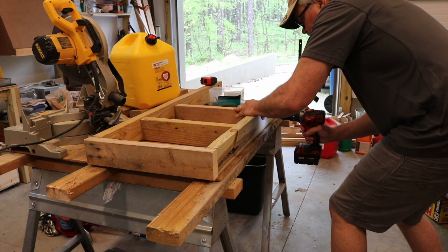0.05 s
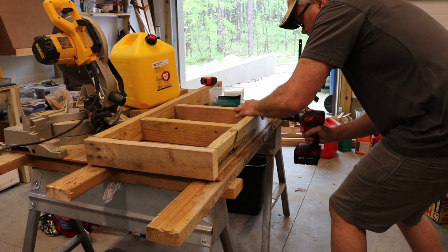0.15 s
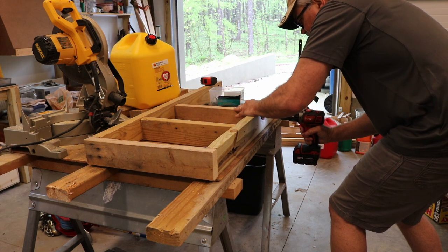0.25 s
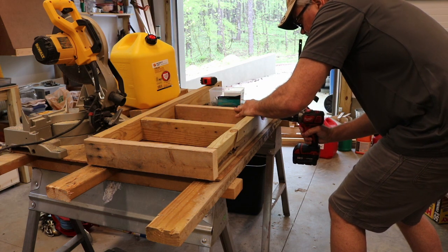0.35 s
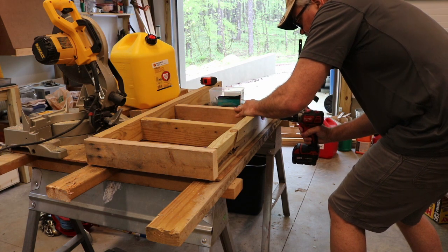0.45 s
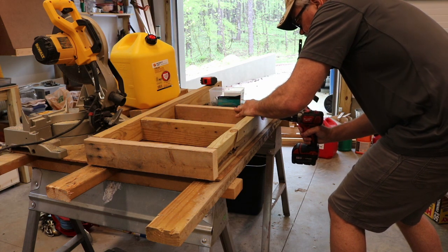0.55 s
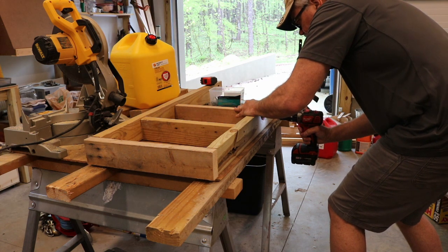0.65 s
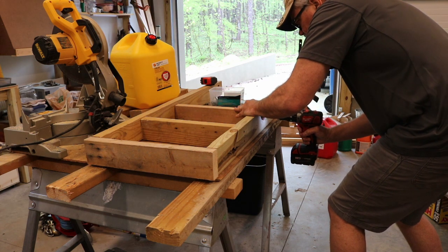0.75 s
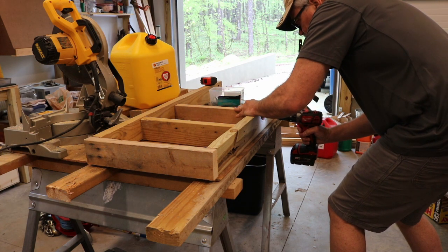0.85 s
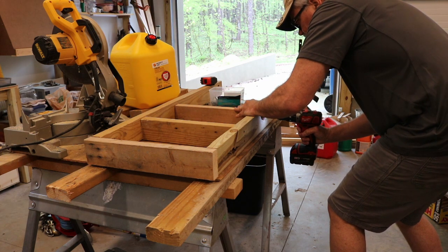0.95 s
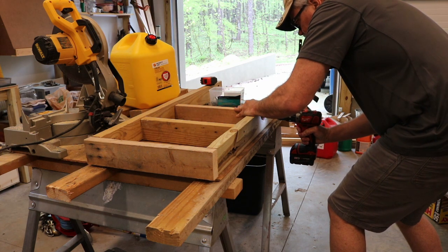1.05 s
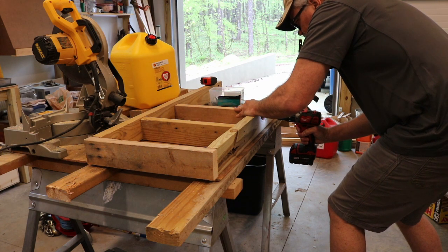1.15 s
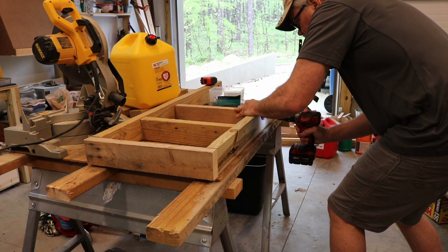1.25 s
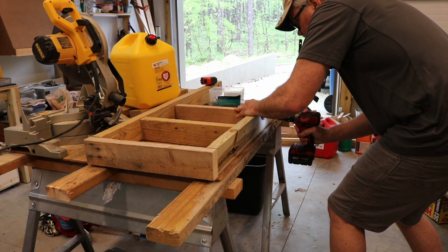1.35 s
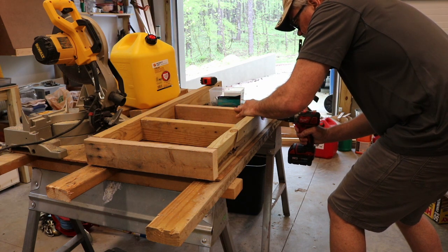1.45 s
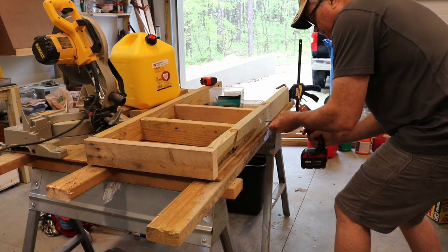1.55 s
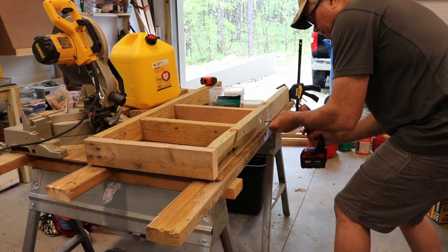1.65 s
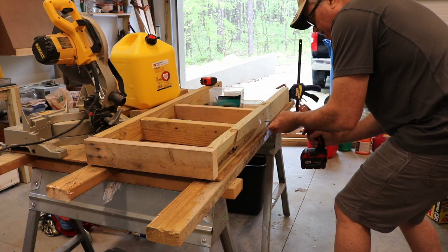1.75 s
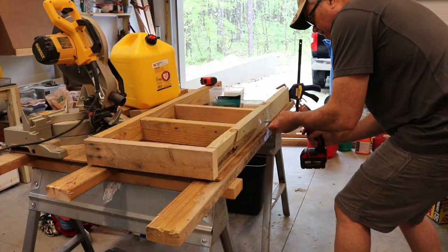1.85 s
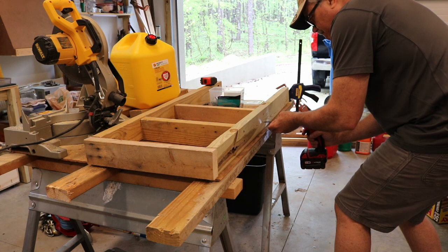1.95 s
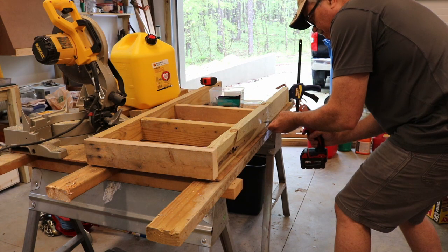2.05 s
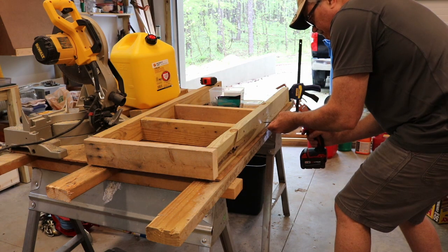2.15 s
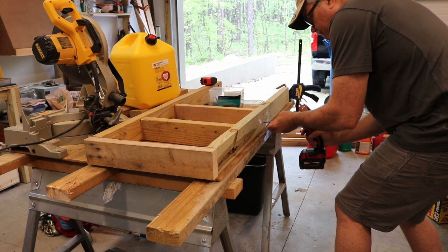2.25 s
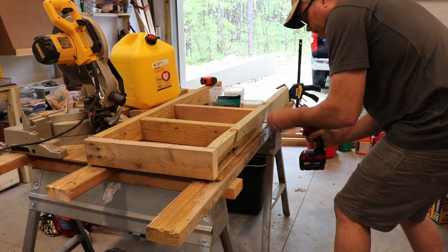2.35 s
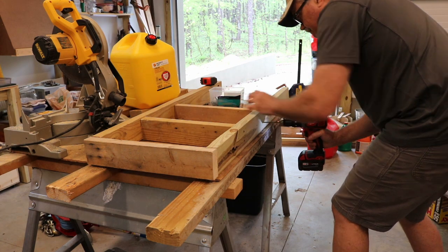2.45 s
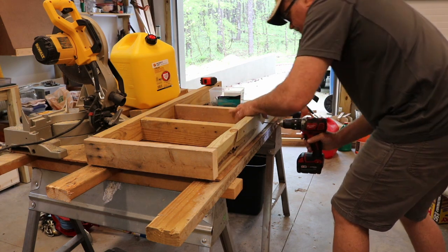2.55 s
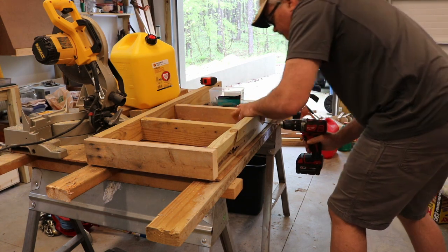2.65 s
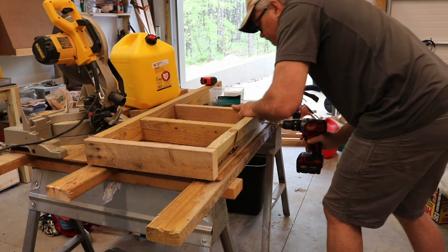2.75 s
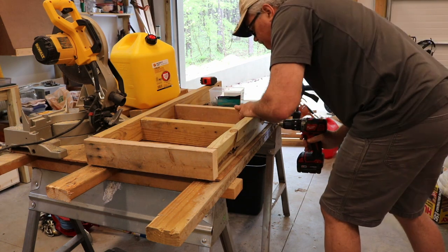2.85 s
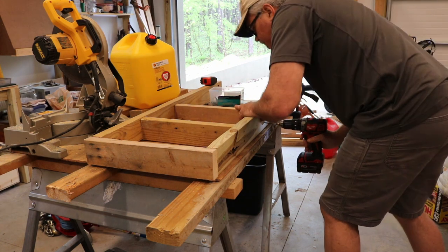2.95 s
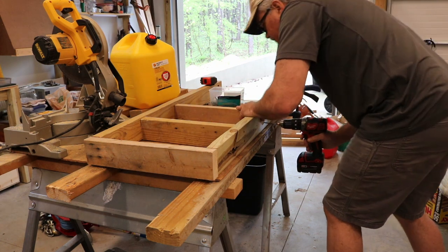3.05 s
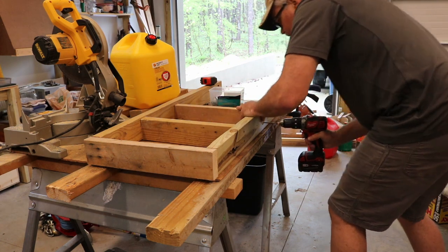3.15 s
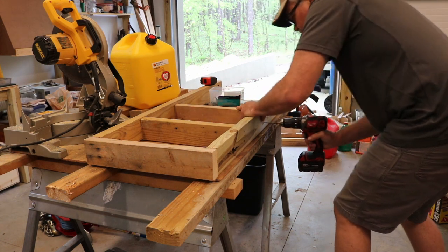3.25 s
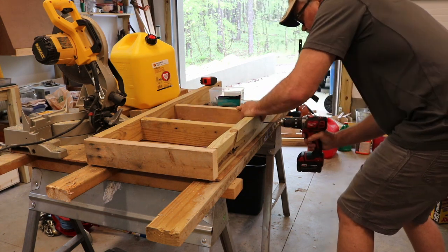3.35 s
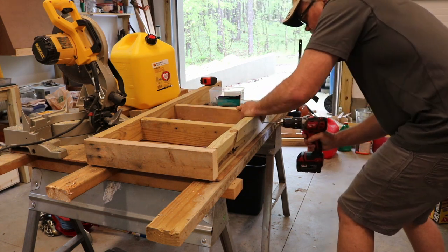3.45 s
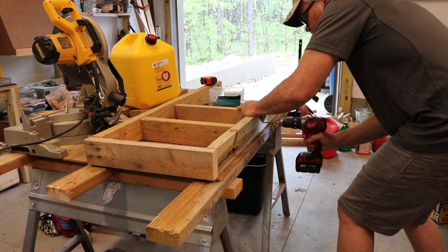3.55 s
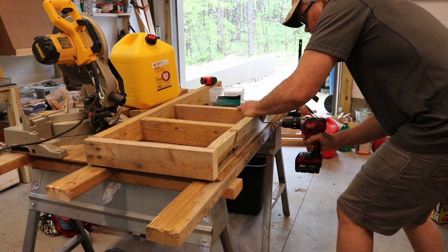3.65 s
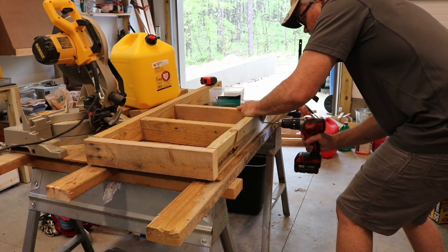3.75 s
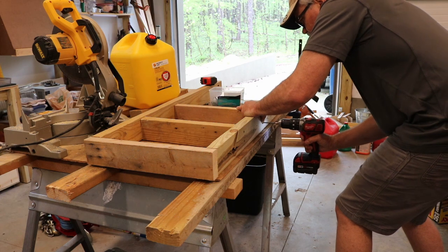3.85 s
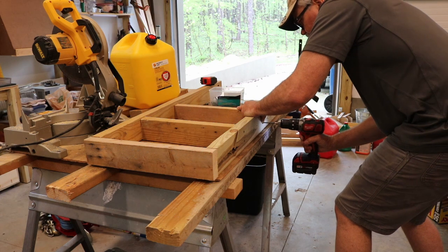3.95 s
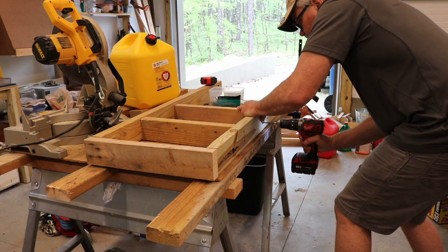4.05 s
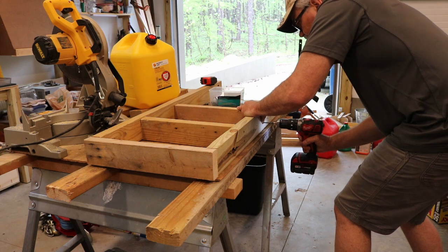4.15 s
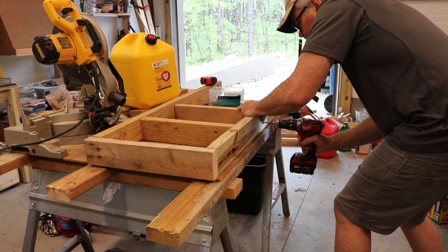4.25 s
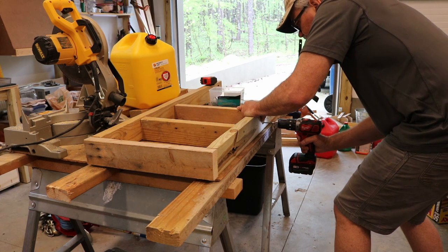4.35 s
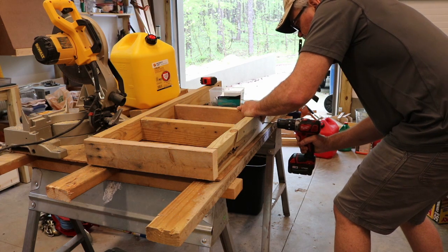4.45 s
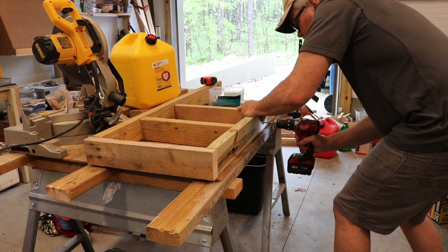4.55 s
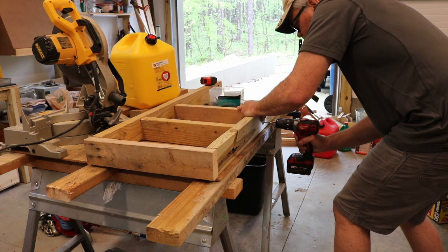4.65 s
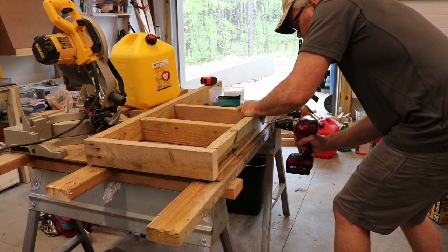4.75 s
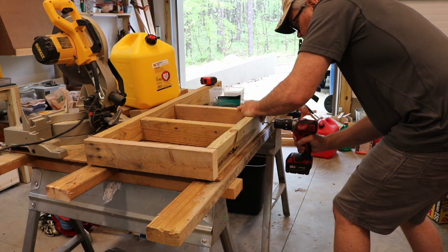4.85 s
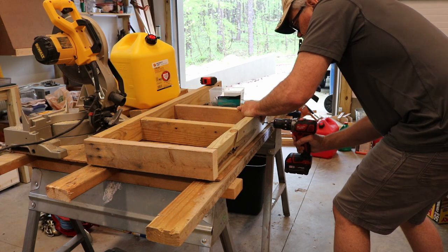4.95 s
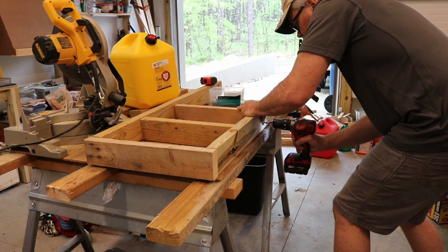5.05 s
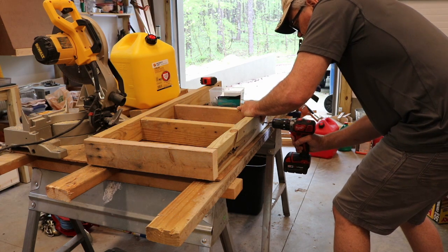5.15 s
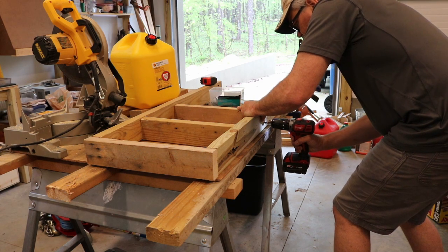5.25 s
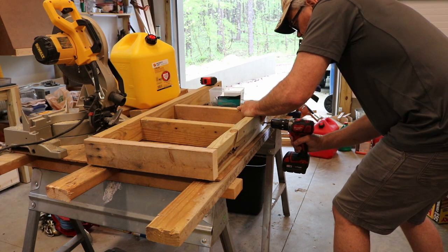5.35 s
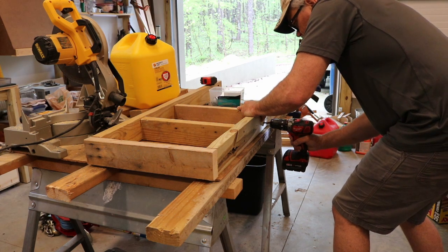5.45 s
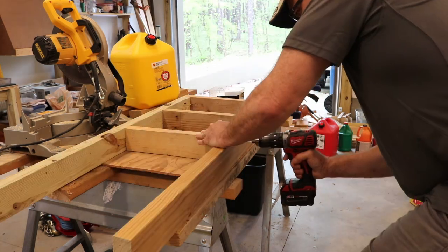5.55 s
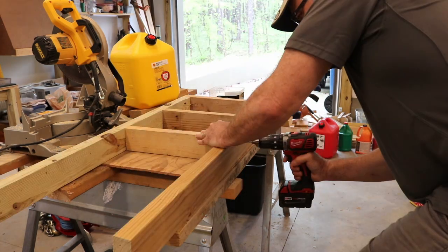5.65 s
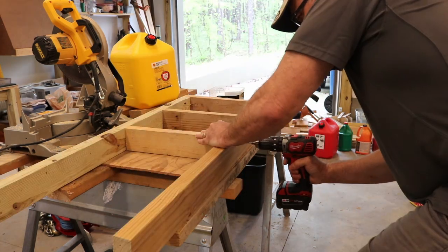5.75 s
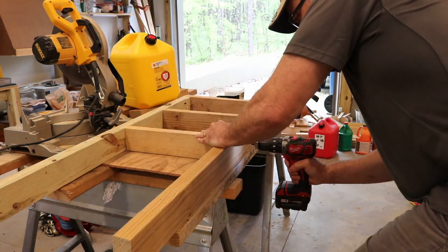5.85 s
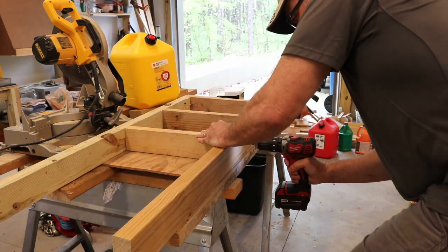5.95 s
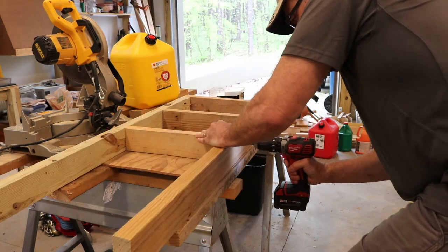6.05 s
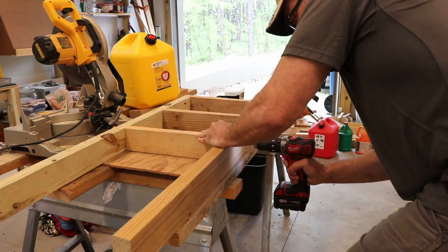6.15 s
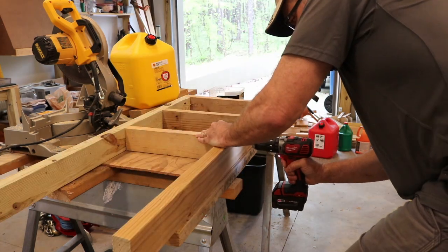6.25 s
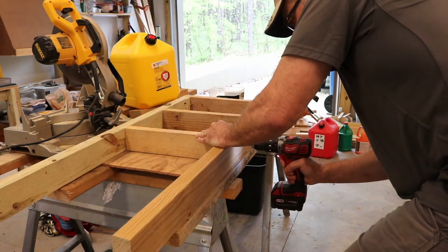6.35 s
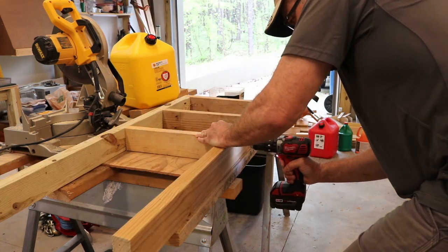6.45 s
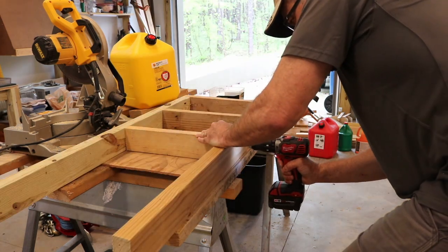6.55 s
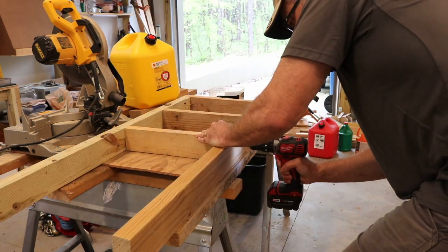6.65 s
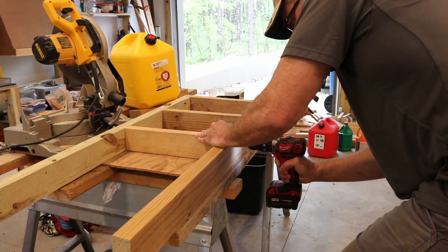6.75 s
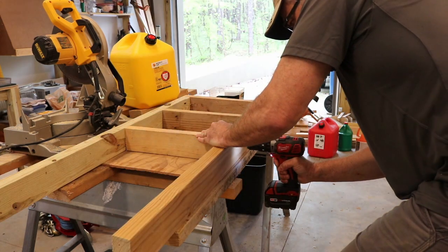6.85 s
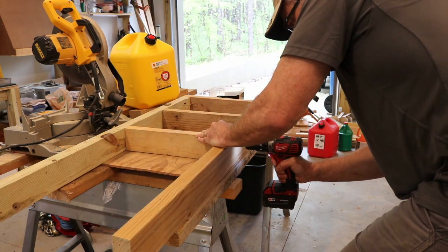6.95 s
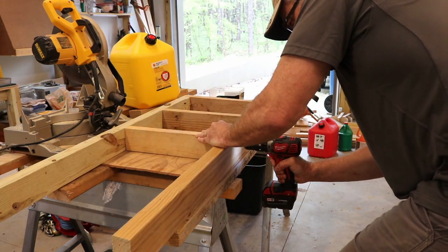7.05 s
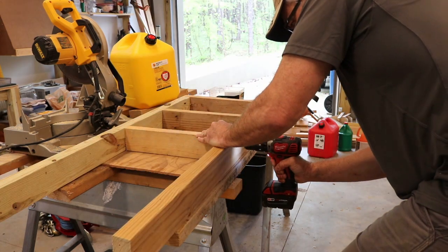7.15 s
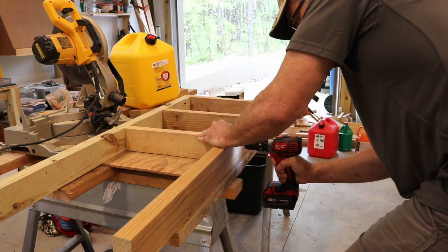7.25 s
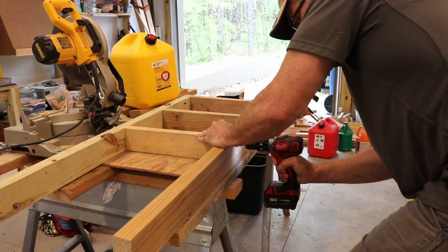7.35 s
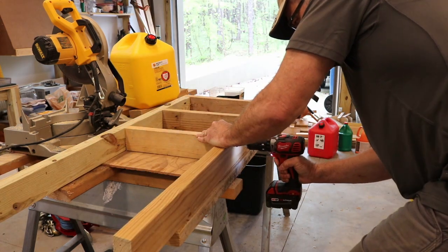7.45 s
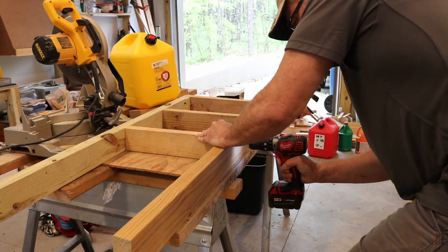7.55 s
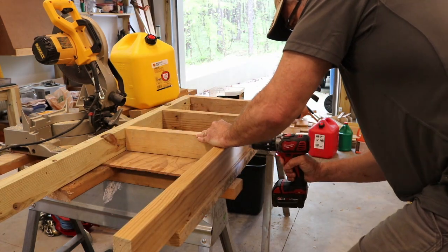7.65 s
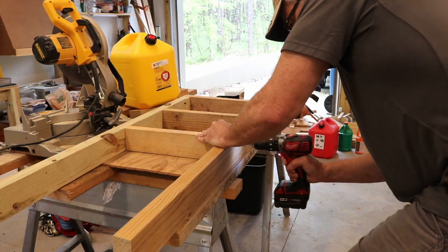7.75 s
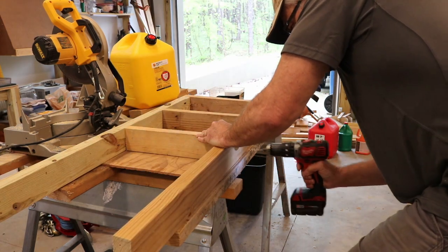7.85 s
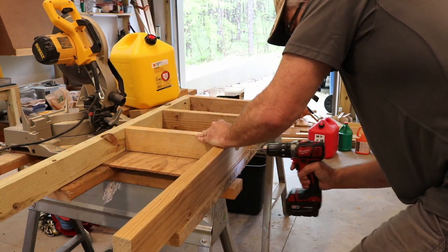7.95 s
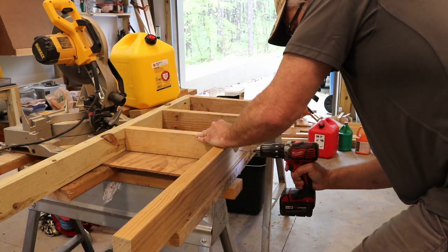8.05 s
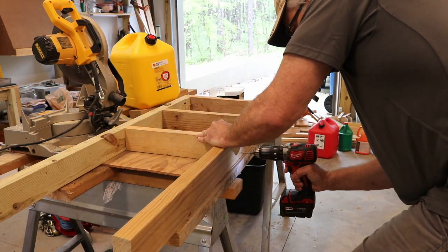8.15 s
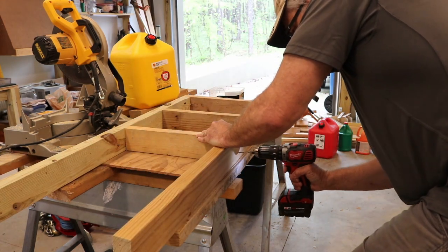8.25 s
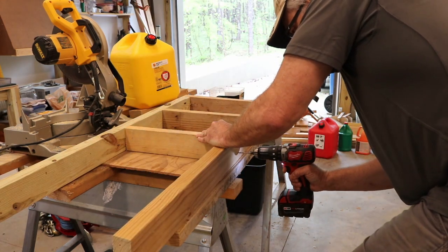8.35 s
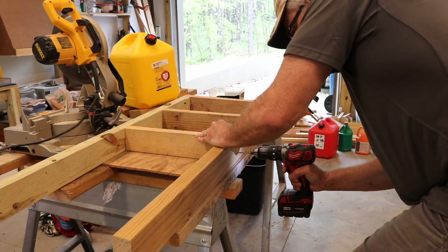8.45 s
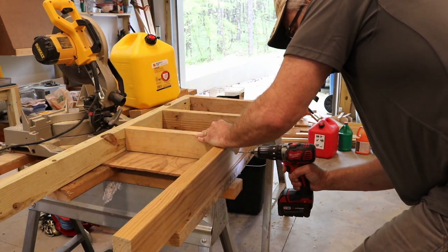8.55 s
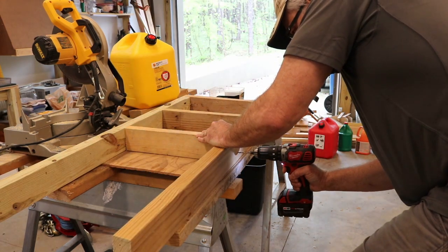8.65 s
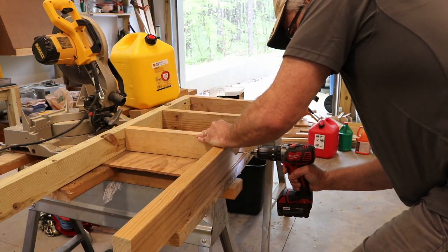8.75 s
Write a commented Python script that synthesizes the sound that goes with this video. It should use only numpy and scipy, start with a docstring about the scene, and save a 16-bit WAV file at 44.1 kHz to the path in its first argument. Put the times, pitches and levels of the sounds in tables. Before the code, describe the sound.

In a garage workshop, a cordless drill close by, slightly right, is already whining at full speed into a wooden frame. It cuts off abruptly; light knocks follow in the quiet. A second run clicks in, creeps, spins up in two steps and cuts off dead. After a clack, a third run leaps to full speed, the wood droning, then stops with a sharp clack and short echo. Soft room noise and fuzzy hum lie beneath.

```python
"""Cordless drill in a garage

A cordless drill bores into a wooden frame three times, over soft room noise and a faint, fuzzy hum.
Motor and gears whine on multiples of the shaft speed, over a rasp of noise that pulses with the turning;
the bit sets the wood droning and shuddering, and short clacks come from trigger, gears and knocks on the frame.
The first two runs break off abruptly, echo and all; the third stops short and rings away in the room."""
import sys
import numpy as np
from scipy import signal
from scipy.fft import rfft, irfft, next_fast_len
from scipy.io import wavfile
from scipy.ndimage import map_coordinates

SR = 44100
rng = np.random.default_rng(int(sys.argv[2]) if len(sys.argv) > 2 else 0)


def bounce(signal):
    """Save signal as a 16-bit WAV file at the path given by the first command-line argument."""
    frames = np.transpose(np.atleast_2d(signal))
    limited = np.clip(frames, -1, 1)
    pcm = np.round(limited * 32767).astype(np.int16)
    wavfile.write(sys.argv[1], SR, pcm)


N = 387638  # length in samples

# The three runs, base levels before push, trigger and trims: start_s, stop_s, swells_per_turn, cutting_db,
# rasp_db, hiss_db, gear_whine_db, motor_whistle_db, weaker_lines_db
RUNS = [(0, 1.546, 0.94, -40.5, -21, -23, -23, -30, 3),
        (3.495, 5.545, 1.8, -40.5, -26, -19.5, -21.5, -29, 3.5),
        (5.865, 7.948, 2, -42.5, -27, -20, -23.5, -32, 3)]
# Squeezes of the trigger: start_s, share_of_full_speed (0-1), spin_up_s (time constant)
SQUEEZES = [(3.541, .83, .043), (4.097, 1, .032), (5.887, 1, .026)]
# Speed with the trigger fully in, as the wood lets the motor run: time_s, speed_turns_per_s
FULL_SPEED = [(.1, 341), (.65, 335.1), (1.54, 331), (3.8, 328.7), (4.2, 328), (4.72, 340.6), (5.04, 338.4),
              (5.22, 330.2), (5.45, 327.7), (5.54, 322), (5.95, 343), (6.12, 346.3), (6.53, 346.7),
              (6.93, 343.3), (7.35, 343.9), (7.9, 345.8)]
# How hard the bit is pushed into the wood: time_s, push (0-1)
PUSH = [(.4, 0.8), (.7, 0.6), (1.3, .85), (1.54, .65), (3.6, 0.15), (4.08, .3), (4.2, 0.7), (4.7, 0.23),
        (5.5, 0.94), (5.95, 0.19), (6.7, 0.62), (7.25, 1), (7.55, 0.35), (7.92, 0)]
# Colour of the noise of bit and gears, relative: pitch_hz, run_1_db, run_2_db, run_3_db
RASP_COLOUR = [(100, -22.5, -47, -54), (184, -15.5, -23.5, -59), (256, -9, -23, -37),
               (466, -7, -8.5, -11.5), (800, -5, -7, -8), (1240, -1.5, -5, -1), (1584, -3.5, -5, -4.5),
               (2850, -2.5, -0.5, 0.5), (3840, 0, 0.4, -1), (5500, 0, 1.5, 2), (6700, 1, 1, 0),
               (9100, 0, 3.5, 4), (12100, -4, 2, 3), (15500, -12.5, 1.5, -0.5)]
# Weaker gear and motor lines, before each run's line level:
# multiple_of_speed, run_1_db, run_2_db, run_3_db
WEAK_LINES = [(4, -45, -41, -42.5), (6, -46, -48, -47.5), (8, -54, -46, -38.5), (10, -37.5, -48, -47),
              (11, -44.5, -60, -66), (12, -66, -46.5, -45.5), (14, -43, -54, -56), (15, -34.5, -55, -59),
              (16, -56, -51, -55), (18, -45, -37, -46), (19, -34, -57, -56), (21, -40, -60, -57),
              (22, -49, -31.5, -38.5), (24, -56, -67, -42), (26, -54, -54, -52), (31, -31, -58, -57),
              (34, -61, -48, -53), (36, -62, -38, -41), (38, -50, -32, -31.5), (40, -48, -36, -34),
              (41, -38, -60, -60), (42, -60, -34, -35), (44, -62, -39, -40.5), (45, -59, -42, -49)]
# The frame's drone in each run, before DRONE_GAIN_DB: time_s, level_db
DRONE_RUN_1 = [(0, -39), (1.54, -41.5)]
DRONE_RUN_2 = [(3.54, -52), (3.65, -41.5), (3.88, -36), (4.3, -42.5), (4.72, -34), (5.4, -38), (5.52, -34)]
DRONE_RUN_3 = [(5.95, -43.5), (6.038, -42), (6.188, -39), (6.702, -44), (7.074, -23.5), (7.258, -28),
               (7.374, -21.5), (7.65, -44), (7.94, -43.5)]
# Frame and gears shudder and sing under load, nominal times before the fades (an end well ahead of its
# start is silent): start_s, stop_s, multiple_of_speed, level_db, roughness (0-1, clipped above)
SHUDDERS = [(0, 1.7, 1, -37.5, 0.26), (0, 1.54, .745, -46.5, .45), (0, 1.54, 1.41, -45, 1.03),
            (0, 1.54, 1.76, -41.5, 0.6), (0, 1.54, .58, -57, 1), (.8, 1.6, 10, -38.5, 0.3),
            (0.599, 1.6, 11, -35.5, 0.4), (.9, 1.7, 15, -36, 0.2), (3.65, 4.05, 2.1, -40, .6),
            (3.65, 4.2, 3.5, -44, 1), (3.65, 4.05, 5.65, -43, .6), (3.68, 4.05, 12, -42, 0.5),
            (3.68, 4.08, 40, -34, .3), (3.75, 3.95, 42, -30, .3), (5.05, 5.5, 1.33, -40.5, 0.5),
            (5.05, 5.7, 3, -39, .5), (5, 5.3, 20, -33, 0.2), (5.2, 4.7, 42, -23, .4),
            (6.75, 7.1, 1.35, -47.5, 0.96)]
# Trigger, brake and small knocks of the tool on the frame, before the mix of ring and crack:
# start_s, level_db, ring_hz, brightness_db
CLACKS = [(1.735, -38, 1050, -18), (2.089, -29, 1117, -27), (2.097, -32, 2700, -22),
          (2.112, -38, 2540, -22), (2.247, -42, 1300, -14), (3.49, -22, 1004, 0), (5.11, -27, 180.4, -20),
          (5.778, -39, 1034, -20), (5.860, -18, 1107, 5.5), (7.932, -14, 1950, -7)]
# Ring modes of the casing: multiple_of_ring, level_db, t60_s
CASING = [(1, 3.5, 0.072), (1.4, 1, 0.034), (2.4, 2, 0.041), (4.3, -4, .03), (6, -1, 0.025)]
# Decay of the garage: pitch_hz, t60_s
GARAGE_DECAY = [(200, 0.29), (2000, 0.45), (7000, 0.44), (15000, 0.33)]
# Likeness of the room sound at the two microphones: pitch_hz, likeness (-1 to 1)
ALIKE = [(60, .9), (250, 1), (640, 0.93), (1400, 0.55), (3000, 0.046), (7000, -0.13), (15000, 0.16)]
# Colour of the room noise, relative: pitch_hz, level_db (per Hz)
AIR_COLOUR = [(25, -39), (60, -25.5), (110, -16), (170, -17.5), (280, -12), (390, -7), (500, -10),
              (740, -7.5), (900, -12), (1850, -16.5), (2560, -15), (3930, -19), (5730, -18.5),
              (15500, -27.5)]
# Lines of the distant fan's hum: pitch_hz, level_db, roughness (0-1)
HUM_LINES = [(117, -68.5, 0.74), (392.4, -54, 0.26), (591, -61.5, 0.38), (748, -61, 0.75), (1050, -65, 0.7),
             (1384, -64.5, 0.56)]
# Phase difference of the microphone ports: pitch_hz, left_lead_rad
PORT_PHASE = [(50, .1), (300, 0.24), (700, 0.28), (1800, 0.029)]

CREEP = .235  # share of full speed at the first touch of the trigger
CREEP_DB, RASP_ATTACK_S = -11.5, 0.039  # noise of the creeping tool; full length of its rise, cut short below
SURGE_DB, SURGE_S = 3, 0.075  # surge of noise at a squeeze: scale of its boost, span that shapes it
PUSH_CUTTING_DB, PUSH_GEAR_DB = 9.5, -10.5  # a full push cuts louder and quietens the gears
CHIRP_DB, CHIRP_HZ_PER_S = 6, 3200  # gear boost while speeding up, and the acceleration that gives all of it
MESH_FROM_HZ = 3830  # the tool's lines emerge as the gear mesh climbs past this
WHISTLE_HZ, WHISTLE_WIDTH_HZ, WHISTLE_BOOST_DB = 10266, 127, 5.5  # a motor resonance lifts its whistle
WHISTLE_DRIVE_DB = 9  # the whistle would be this much weaker with no drive
DRONE_GAIN_DB = 4
AIR_PAN_DB = 0.6  # room noise and hum are this much louder on the left
DUCK_DB, DUCK_KNEE_DB, DUCK_S = 4, -25, 0.024  # gain control: deepest cut, level of half that cut, time constant
TOP_HZ = 15780  # band limit


def drill(index, drone_points, rings_on):
    """One run: trigger and push set speed and effort, and the shaft ties all the drill's sounds together."""
    start, stop, beats, cutting_db, rasp_db, hiss_db, gear_db, whistle_db, lines_db = RUNS[index - 1]
    first, last = max(0, round(start * SR)), min(N, round((stop + .5) * SR))
    t = np.arange(first, last) / SR
    # the first run is already at full speed
    share, noise_db = trigger(t, start, stop) if index > 1 else (1, 0)
    speed, push = share * curve(FULL_SPEED, t), curve(PUSH, t)
    # the load shakes the speed
    shake = 1 + 0.000926 * wobble(t, 25.09) + 0.001034 * wobble(t, 200)
    turns = np.cumsum(speed * shake) / SR
    drive = (speed / speed.max()) ** 3
    on = gate(t, start, stop, fade=0.017)

    emerge_db = -20 * np.log10(1 + (MESH_FROM_HZ / (20 * speed)) ** 12)
    detune = (30 * speed - WHISTLE_HZ) / WHISTLE_WIDTH_HZ
    resonance_db = WHISTLE_BOOST_DB / (1 + detune ** 2)
    whistle_db = whistle_db + noise_db + WHISTLE_DRIVE_DB * (drive - 1)
    whistle_db = whistle_db + resonance_db + emerge_db + 2.3 * wobble(t, 6.8)
    acceleration = np.gradient(speed) * SR
    chirp_db = CHIRP_DB * np.clip(acceleration / CHIRP_HZ_PER_S, 0, 1)
    gear_db = gear_db + PUSH_GEAR_DB * push + chirp_db + emerge_db + 1.0 * wobble(t, 7)

    colour = [(row[0], row[index]) for row in RASP_COLOUR]
    orders = [(round(row[0]), row[index]) for row in WEAK_LINES]
    low, high = orders[:3], orders[3:]  # the wood radiates the lowest lines, the tool the rest
    cutting_db = cutting_db + PUSH_CUTTING_DB * push
    noise = amp(noise_db) * rasp(t, turns, colour, cutting_db, rasp_db, hiss_db, beats)
    lines = whine(t, turns, high, gear_db, whistle_db, drive * amp(lines_db))
    drone_db = curve(drone_points, t) + DRONE_GAIN_DB + emerge_db
    frame = drone(t, turns, drone_db, low, share ** 2 * amp(lines_db + emerge_db))

    lag = 2 if index == 1 else 1  # the first hole lies further to the right
    sound = garage(on * noise, wet_db=2.5, count=lag)
    sound = sound + garage(on * lines, wet_db=-4.0, count=lag)
    sound = sound + garage(on * frame, wet_db=-8.5, count=lag)
    if not rings_on:
        sound = sound * on  # cuts the echo off too
    return np.pad(sound, ((0, 0), (first, N - last)))


def trigger(t, start, stop):
    """Each squeeze spins the motor up to a new share of full speed, with a noise surge; gives share, noise dB."""
    squeezes = [row for row in SQUEEZES if start < row[0] < stop]
    share, held = CREEP, CREEP
    noise_db = CREEP_DB * np.clip((squeezes[0][0] - t) / RASP_ATTACK_S + .62, 0, 1)
    for squeeze_s, aim, spin_up_s in squeezes:
        since = np.maximum(t - squeeze_s, 0)
        share = share + (aim - held) * (1 - np.exp(-since / spin_up_s))
        jerk = (aim - held) * SQUEEZES[-1][2] / spin_up_s  # a harder, quicker squeeze surges more
        noise_db = noise_db + SURGE_DB * jerk * since / SURGE_S * np.exp(2 - 2 * since / SURGE_S)
        held = aim
    return share, noise_db


def rasp(t, turns, colour, cutting_db, rasp_db, hiss_db, beats):
    """Chips and gear teeth: grainy noise in three registers that swells beats times a turn."""
    swell = np.cos(2 * np.pi * beats * turns)
    carrier = np.cos(2 * np.pi * beats * turns / 7)  # the planet carrier swells seven times slower
    grain_db = 1.2 * wobble(t, 1500) + 0.69 * wobble(t, 45.4)
    pulse = (1 + 0.33 * swell + 0.094 * carrier) * amp(grain_db)

    def below(hz, edge_hz):
        """Power share under a soft band edge."""
        return 1 / (1 + (hz / edge_hz) ** 8)

    def noise(share):
        """Pulsed, coloured noise of one register, at rms 1."""
        raw = pulse * rng.standard_normal(len(t))
        return unit(filtered(raw, lambda hz: amp(along(colour, hz)) * np.sqrt(share(hz))))

    cutting = noise(lambda hz: below(hz, edge_hz=1395) * (1 - below(hz, edge_hz=45)))
    middle = noise(lambda hz: below(hz, edge_hz=6680) * (1 - below(hz, edge_hz=1490)))
    hiss = noise(lambda hz: 1 - below(hz, edge_hz=5500))
    return amp(cutting_db) * cutting + amp(rasp_db) * middle + amp(hiss_db) * hiss


def whine(t, turns, orders, gear_db, whistle_db, drive):
    """Gear mesh at 20 times the speed, motor whistle at 30 times, and weaker lines that grow with the drive."""
    def line(k):
        return tone(t, order_cycles(k, turns), rough=0.35, rate=30)

    weak = sum(amp(db + 1.8 * wobble(t, 4.37)) * line(k) for k, db in orders)
    mesh, whistle = line(20), line(30)
    return drive * weak + amp(gear_db - 1.9) * mesh + amp(whistle_db + 2.0) * whistle


def drone(t, turns, drone_db, orders, drive):
    """The frame drones at twice the motor speed, with overtones, and shudders where the bit bites."""
    sound = amp(drone_db) * tone(t, order_cycles(2, turns), rough=0.28, rate=70)
    overtones = sum(amp(db) * tone(t, order_cycles(k, turns), rough=0.21, rate=25) for k, db in orders)
    sound = sound + drive * overtones
    for start, stop, k, db, rough in SHUDDERS:
        if t[0] < (start + stop) / 2 < t[-1]:
            swell = gate(t, start + 0.026, stop + 0.15, fade=0.093)
            sound = sound + amp(db) * swell * tone(t, order_cycles(k, turns), rough, rate=45)
    return sound


def clacks():
    """Gear slack is taken up, or the tool touches the wood: a noise crack and a short ring of casing modes."""
    out, t = np.zeros(N + SR), np.arange(SR // 4) / SR
    dull_band = signal.butter(2, [1000, 3500], "band", fs=SR, output="sos")
    bright_band = signal.butter(2, 2500, "high", fs=SR, output="sos")
    for start, db, ring_hz, bright_db in CLACKS:
        ring = 0
        for k, level_db, t60 in CASING:
            mode = np.sin(2 * np.pi * (k * ring_hz * t + rng.random()))
            ring = ring + amp(level_db - 60 * t / t60) * mode
        ring = ring * (1 - np.exp(-2 * ring_hz * t))  # a low knock starts softly
        crack = amp(-60 * t / 0.047) * rng.standard_normal(len(t))
        dull = signal.sosfilt(dull_band, crack)
        bright = signal.sosfilt(bright_band, crack)
        clack = 0.23 * ring + 0.99 * dull + 0.31 * amp(bright_db) * bright
        out[round(start * SR):][:len(t)] += amp(db) * clack
    return garage(out[:N], wet_db=-7.0)


def garage(x, wet_db, count=1):
    """Direct sound from the right (count samples later on the left) plus wall echo, at about equal total power."""
    hz, t, z = signal.stft(rng.standard_normal((2, SR // 2)), SR, nperseg=256)
    decay = amp(-60 * t / along(GARAGE_DECAY, hz)[:, None])
    tail = diffuse(signal.istft(z * decay, SR, nperseg=256)[1])
    tail = np.pad(tail / np.linalg.norm(tail[0]), ((0, 0), (SR // 300, 0)))  # the echo starts 1/300 s late
    echo = signal.fftconvolve(x[None], tail, axes=1)[:, :len(x)]
    left = amp(-0.84) * np.pad(x, (count, 0))[:-count]
    direct = np.array([left, amp(0.66) * x])
    return (direct + amp(wet_db) * echo) / np.hypot(1, amp(wet_db))


def diffuse(pair):
    """Two unrelated signals become a room's sound field: alike in the bass, nearly unrelated in the treble."""
    def rotation(hz):
        turn = np.arccos(np.clip(along(ALIKE, hz), -1, 1)) / 2
        return np.array([np.cos(turn), np.sin(turn)])

    mid, side = filtered(pair, rotation)
    return np.array([mid + side, mid - side])


def background():
    """Soft coloured room noise and the fuzzy hum of a distant fan, made of fluttering tones."""
    t = np.arange(N) / SR
    air = unit(diffuse(filtered(rng.standard_normal((2, N)), lambda hz: amp(along(AIR_COLOUR, hz)))))
    hum = sum(amp(db) * tone(t, hz * t, rough, rate=40) for hz, db, rough in HUM_LINES)
    return amp(-46.5 + 1.15 * wobble(t, 6)) * air + hum


def tone(t, cycles, rough, rate):
    """A tone of rms 1 on the given cycle count; rough is the part of it that flutters at random."""
    rough = np.clip(rough, 0, 1)
    flutter = (wobble(t, rate) + 1j * wobble(t, rate)) / np.sqrt(2)
    size = np.sqrt(1 - rough ** 2) + rough * flutter
    return np.sqrt(2) * np.real(size * np.exp(2j * np.pi * cycles))


def order_cycles(k, turns):
    """Cycles of the line at k times the speed, each offset in the turn so that they do not pile up into clicks."""
    return k * (turns + k / 97)


def wobble(t, rate):
    """A smooth random curve over the times t, rate knots a second."""
    u = (t - t[0]) * rate
    return map_coordinates(rng.standard_normal(int(u[-1]) + 4), [u])


def gate(t, start, stop, fade):
    """1 between start and stop, ramping up ahead of start and down ahead of stop."""
    return np.clip((t - start) / fade + 1, 0, 1) * np.clip((stop - t) / fade, 0, 1)


def curve(points, t):
    """(time_s, value) points joined by straight lines."""
    return np.interp(t, *np.transpose(points))


def along(points, hz):
    """(pitch_hz, value) points read on a log axis."""
    f, v = np.transpose(points)
    return np.interp(np.log(hz + 1), np.log(f + 1), v)


def filtered(x, response):
    """x shaped by a response of frequency."""
    n = x.shape[-1]
    m = next_fast_len(n + 8192)
    return irfft(rfft(x, m) * response(np.fft.rfftfreq(m, 1 / SR)), m)[..., :n]


def amp(db):
    """Decibels to gain."""
    return 10 ** (np.asarray(db) / 20)


def unit(x):
    """Scaled to rms 1."""
    return x / np.sqrt(np.mean(x ** 2) + 1e-20)


def scene():
    """Three runs of the drill, its clacks and the room."""
    first = drill(index=1, drone_points=DRONE_RUN_1, rings_on=False)
    second = drill(index=2, drone_points=DRONE_RUN_2, rings_on=False)
    third = drill(index=3, drone_points=DRONE_RUN_3, rings_on=True)
    pan = amp(AIR_PAN_DB * np.array([[.5], [-.5]]))
    return first + second + third + clacks() + background() * pan


def record(dry):
    """Gain control turns loud passages down a little; the ports differ in phase; the band limit cuts the top."""
    keep = np.exp(-1 / (DUCK_S * SR))
    power = signal.lfilter([1 - keep], [1, -keep], np.mean(dry ** 2, axis=0))
    gain = amp(-DUCK_DB * power / (power + amp(DUCK_KNEE_DB) ** 2))

    def response(hz):
        ports = np.exp(.5j * np.array([[1], [-1]]) * along(PORT_PHASE, hz))
        return ports * (hz < TOP_HZ)

    return filtered(dry * gain, response)


dry = scene()
out = record(dry)
bounce(out)
```